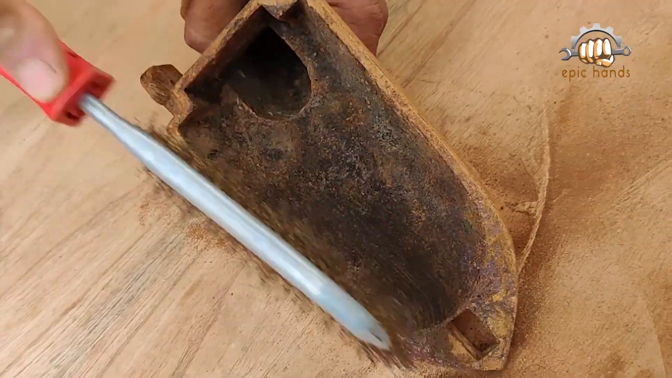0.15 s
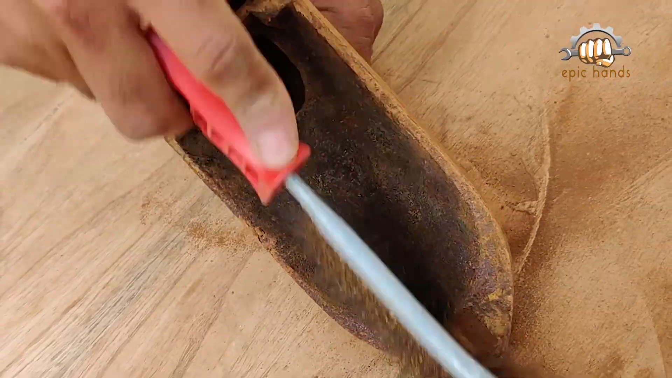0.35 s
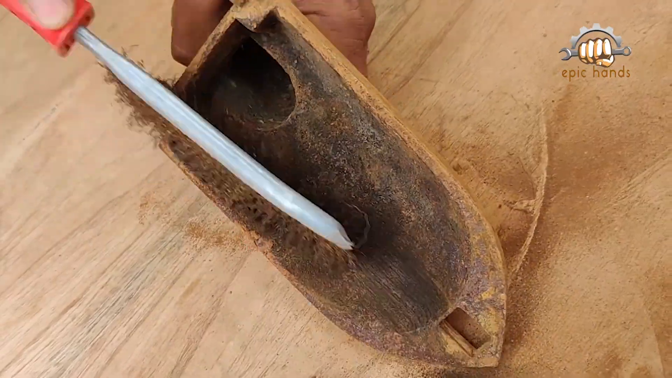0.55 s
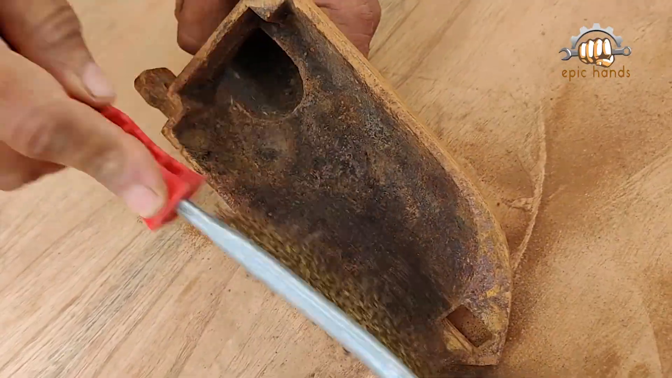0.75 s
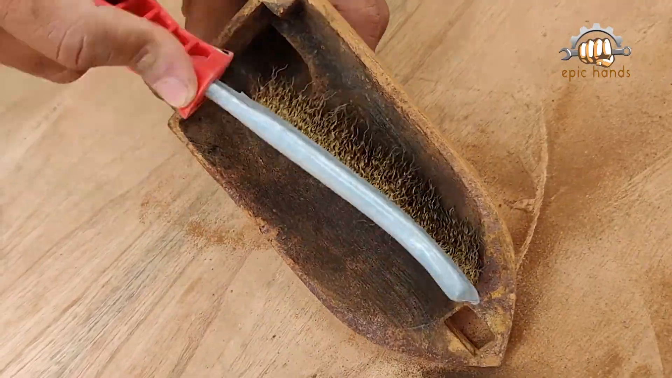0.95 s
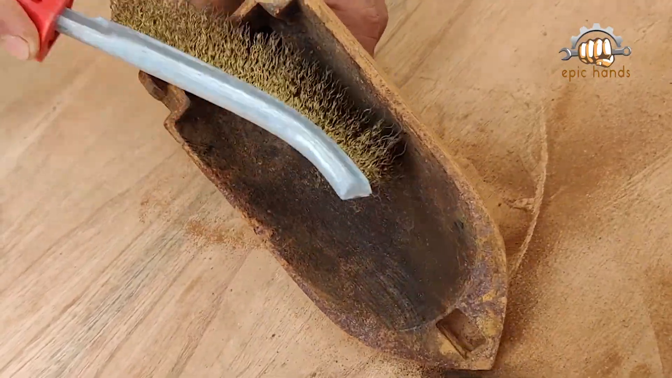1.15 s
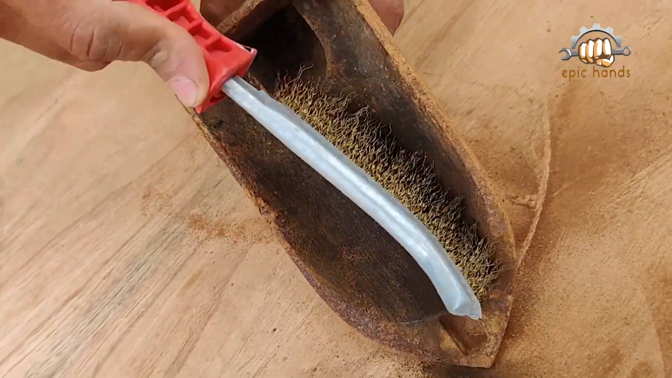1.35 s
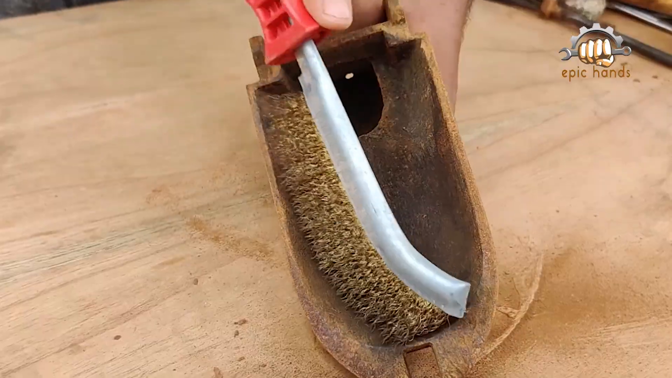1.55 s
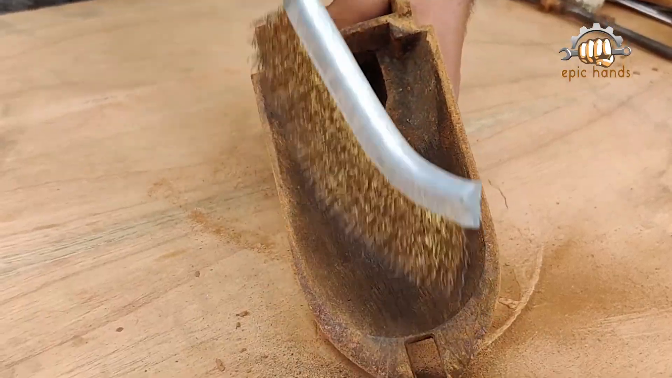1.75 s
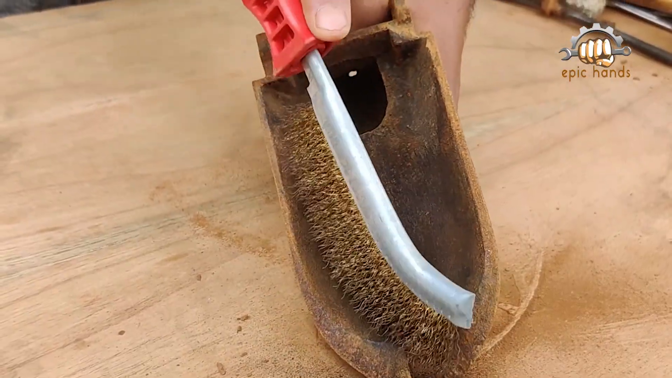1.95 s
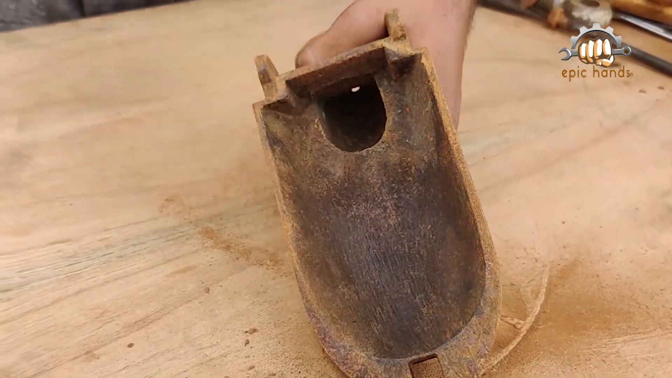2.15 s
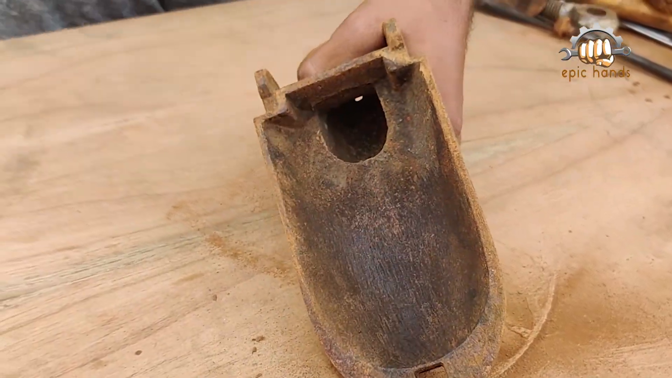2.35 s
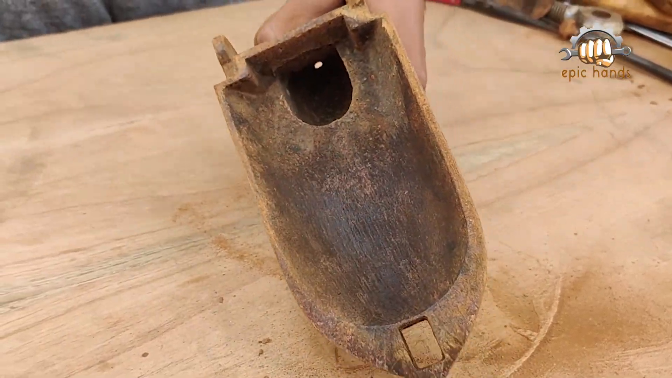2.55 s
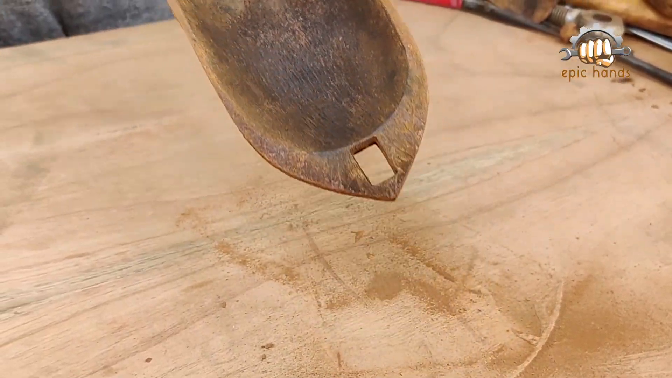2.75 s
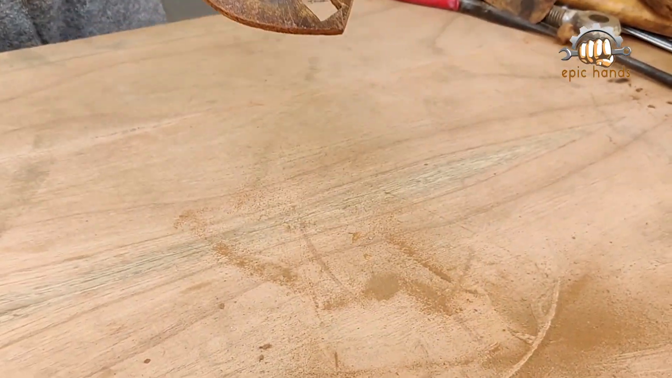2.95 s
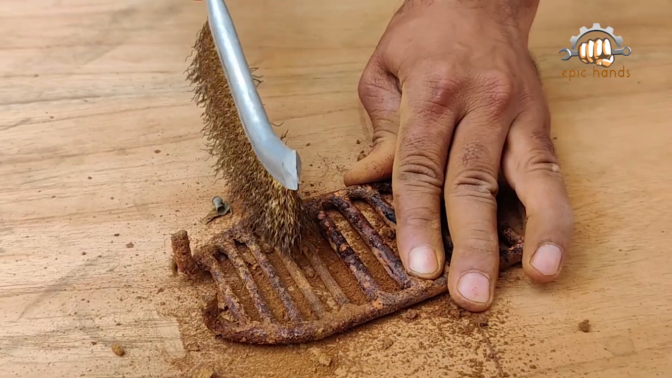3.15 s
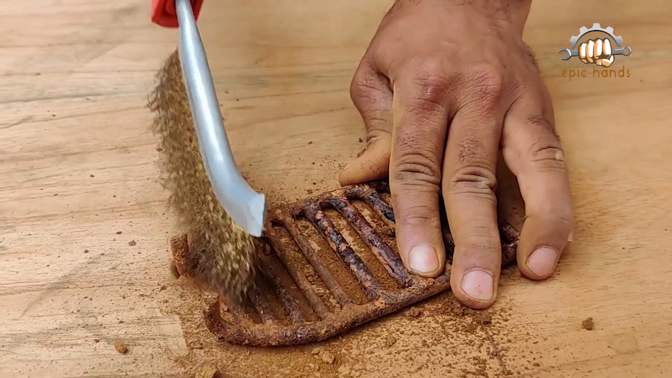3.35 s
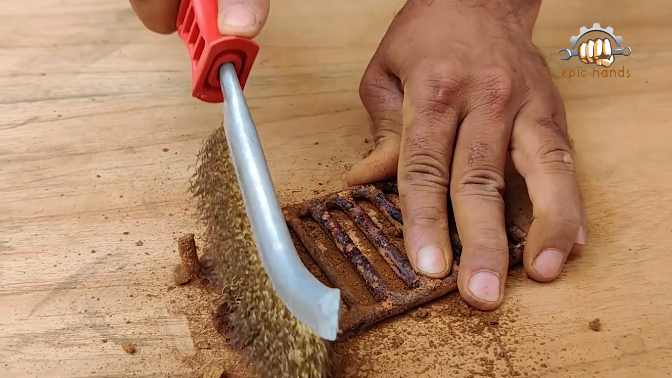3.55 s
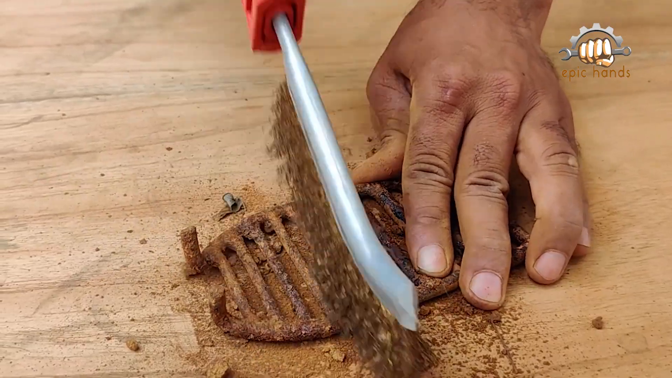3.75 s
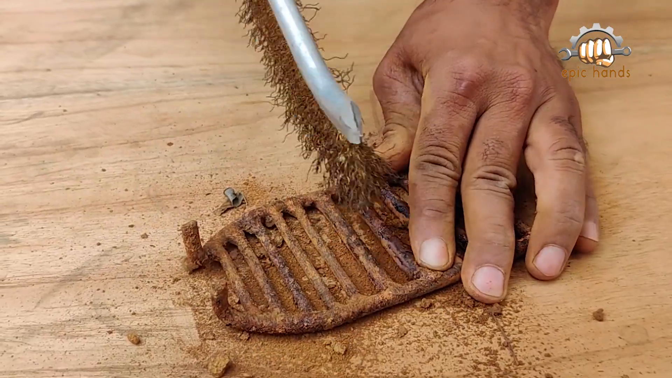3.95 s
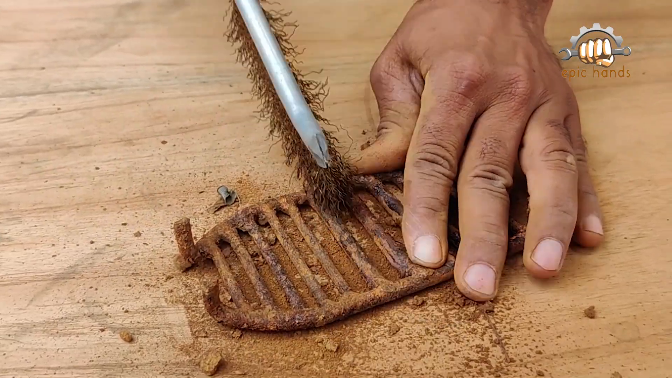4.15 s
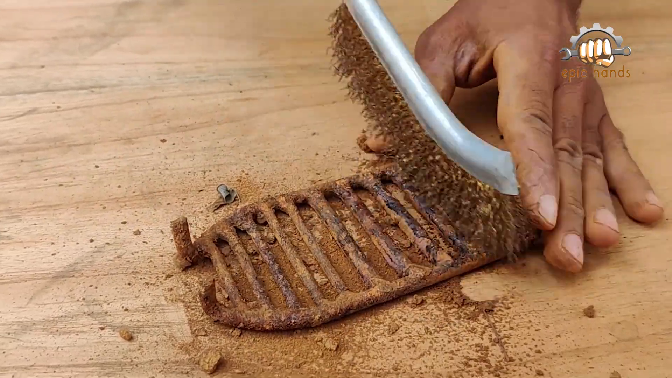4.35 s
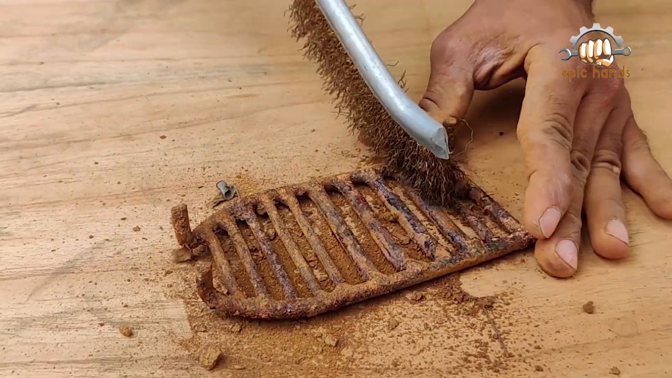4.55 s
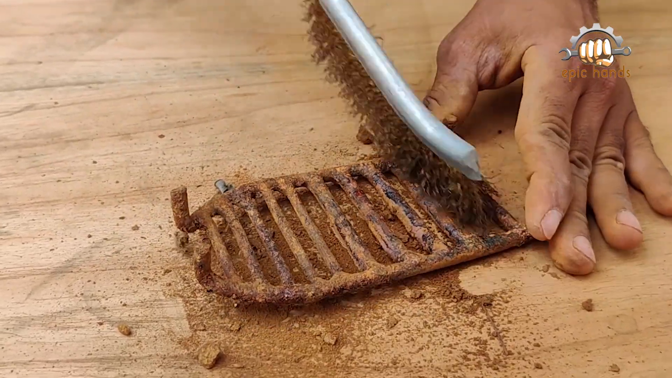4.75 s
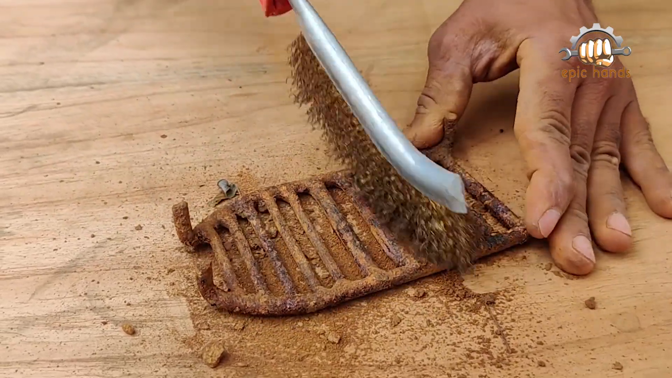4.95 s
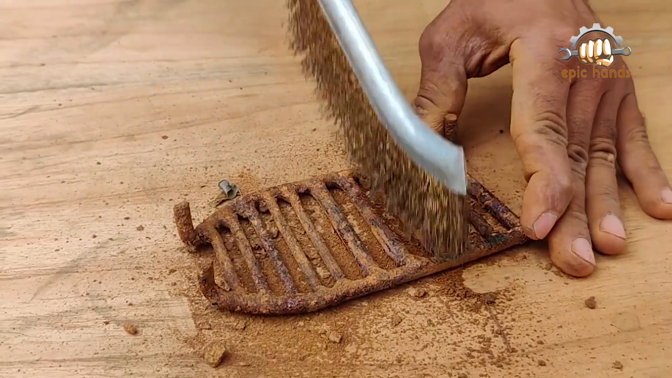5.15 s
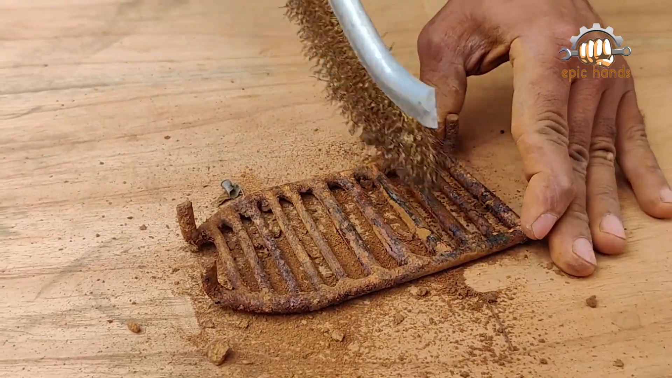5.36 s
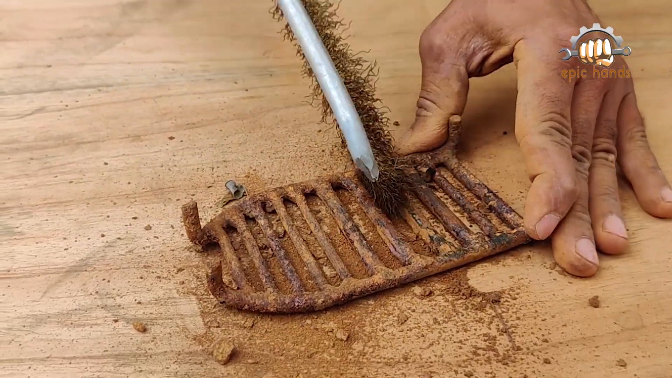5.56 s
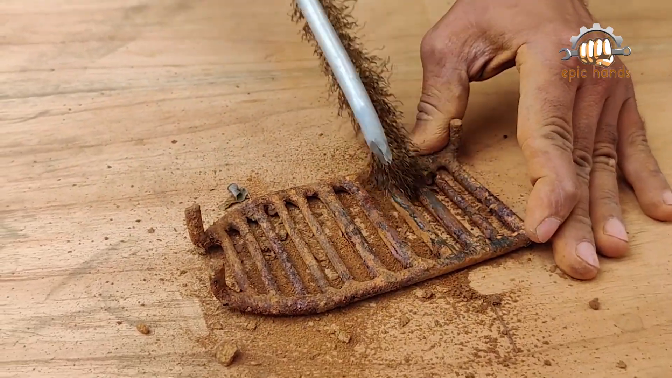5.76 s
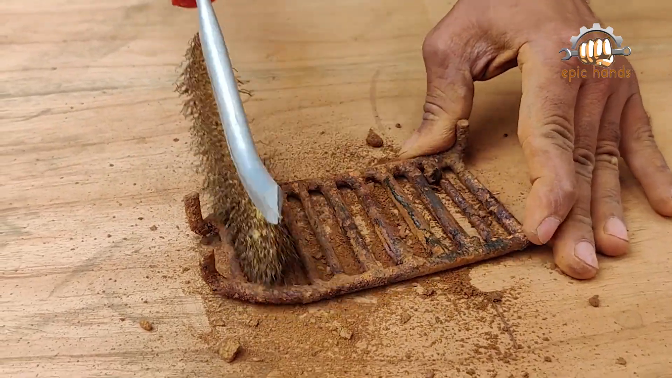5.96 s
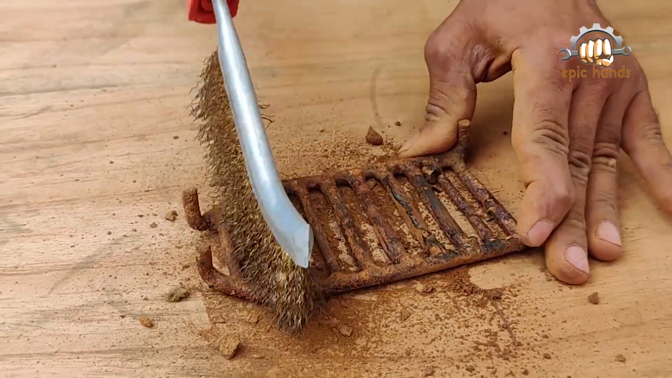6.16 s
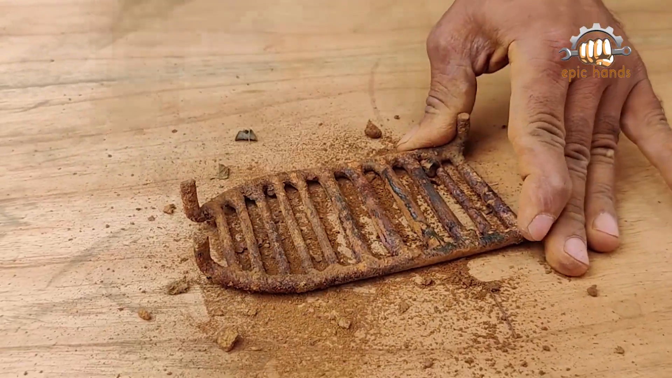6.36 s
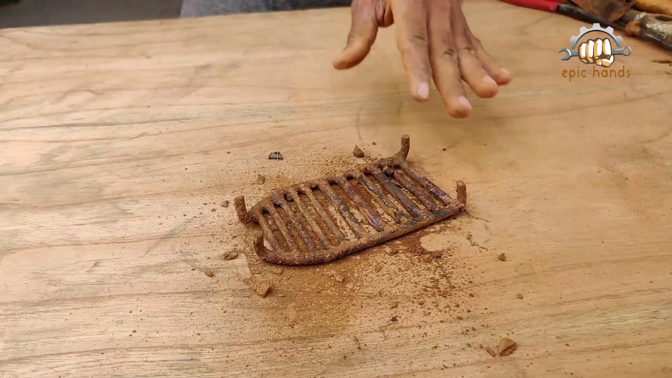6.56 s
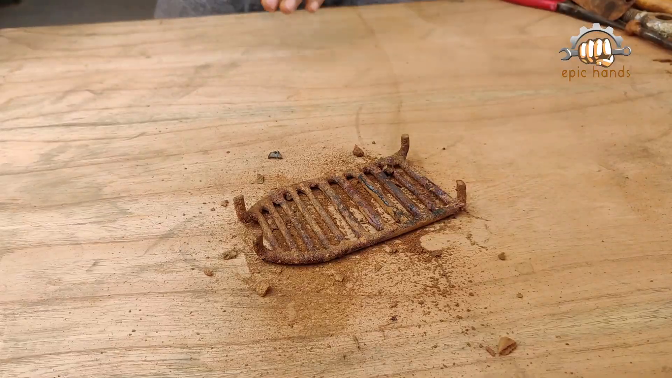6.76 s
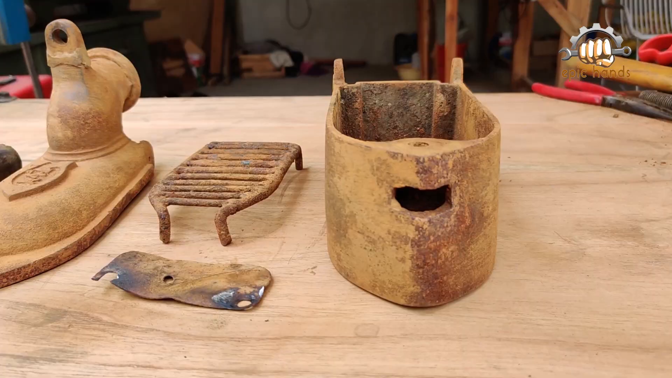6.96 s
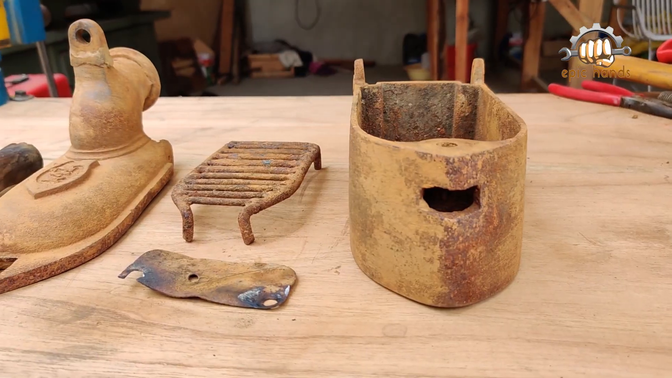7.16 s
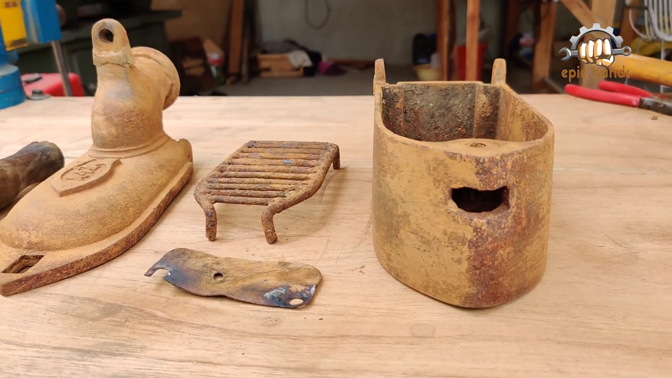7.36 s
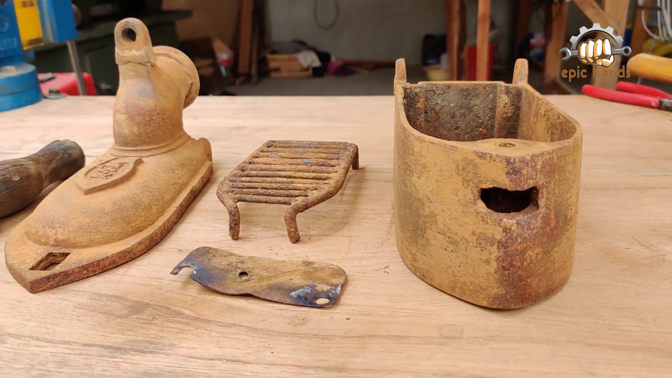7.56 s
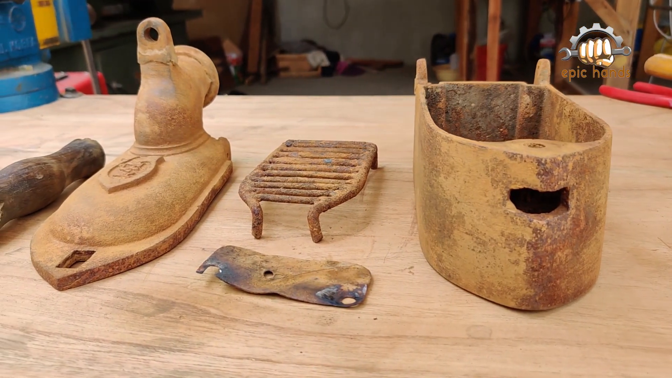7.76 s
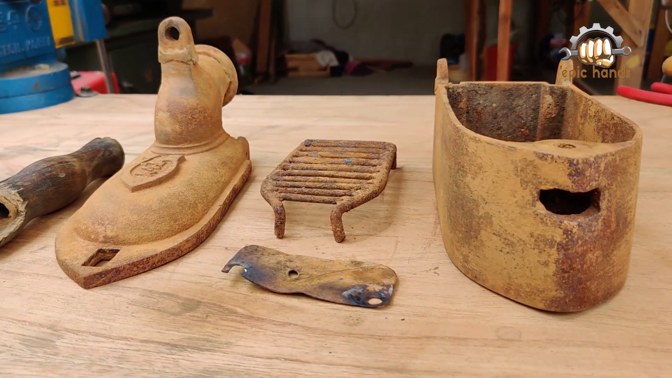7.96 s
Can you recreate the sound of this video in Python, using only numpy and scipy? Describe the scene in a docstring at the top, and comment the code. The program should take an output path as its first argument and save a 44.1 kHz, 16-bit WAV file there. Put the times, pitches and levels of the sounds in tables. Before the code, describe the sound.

A wire brush scrubs a rusty iron casting, the casting squeals as it drags away, then brush strokes slap a squeaking iron grate before birdsong.

```python
"""A wire brush scrubs a rusty iron casting on a wooden bench, then slaps and scrapes an iron grate: clumps
of bristle snaps excite coloured hiss, scrape and rumble, and blows ring the modes of the iron and bench.
In between the casting is dragged off with a squeal, and the grate squeaks too: pulse trains of stick and slip.
Under it the bench sways. Last come one far knock (decaying sines), a bird (gliding sines) and louder workshop
air (shaped noise). Heard by a spaced pair of microphones."""
import sys
import numpy as np
from scipy import signal
from scipy.fft import rfft, irfft, next_fast_len
from scipy.io import wavfile
from scipy.ndimage import uniform_filter1d

SR = 44100
rng = np.random.default_rng(int(sys.argv[2]) if len(sys.argv) > 2 else 0)


def unload_wav(signal):
    """Save mono or channel-first audio to the path in sys.argv[1] as 16-bit WAV at rate SR, clipped to [-1, 1]."""
    wavfile.write(
        sys.argv[1],
        SR,
        np.round(np.clip(np.atleast_2d(signal).T, -1, 1) * 32767).astype(np.int16),
    )


N = 357210


def gain_of(db):
    """Decibels to an amplitude factor."""
    return 10 ** (np.asarray(db) / 20)


def evened(x):
    """Scales to rms 1."""
    return x / np.sqrt(np.mean(x ** 2) + 1e-20)


def read(points, hz):
    """Reads a curve of (frequency, value) points on a log-frequency axis."""
    f, value = np.transpose(points)
    return np.interp(np.log(hz + 1), np.log(f + 1), value)


def add(mix, start_s, sound):
    """Mixes a sound in at a time."""
    part = mix[round(start_s * SR):][:len(sound)]
    part += sound[:len(part)]


def unroll(rows):
    """Start time of a table and its other columns, interpolated sample by sample."""
    s, *columns = np.transpose(rows)
    t = np.arange(s[0], s[-1], 1 / SR)
    return s[0], [np.interp(t, s, c) for c in columns]


def smoothed(x, across, along):
    """Averages a noise field over its first and second axis, then scales it to rms 1."""
    return evened(uniform_filter1d(uniform_filter1d(x, across, axis=0), along, axis=1))


def drift(n, smooth):
    """Random wander of rms 1 that changes over about smooth samples."""
    noise = rng.standard_normal(n)
    return evened(uniform_filter1d(uniform_filter1d(noise, int(smooth)), int(smooth)))


def heard(x, left_lag, pan_db):
    """Spaced pair: the left hears the source left_lag samples later and pan_db louder than the right."""
    size = next_fast_len(len(x) + 256)
    turn = np.exp(-1j * np.pi * np.fft.rfftfreq(size) * left_lag)
    z = rfft(x, size)
    left = irfft(z * turn, size) * gain_of(pan_db / 2)
    right = irfft(z / turn, size) * gain_of(-pan_db / 2)
    return np.array([left, right])[:, :len(x)]


# colour of the workshop air, still and then louder: pitch_hz, level_db (per Hz)
AIR_STILL = [(15, -27), (25, 6.5), (476, -15.5), (591, -10), (734, -23.5), (818, -19), (1070, -20),
             (2220, -22), (2910, -26), (6560, -31), (16000, -44.5)]
AIR_LOUD = [(15, -30), (25, 1), (64, -5), (217, -17.5), (363, -16), (439, -19), (714, -16.5), (988, -23.5),
            (2990, -24.5), (9320, -40), (16000, -31.5)]
# left-right likeness of air and room: pitch_hz, likeness (share)
LIKENESS = [(60, 0.835), (300, 0.853), (700, 0.566), (1500, 0.035), (5000, 0.027)]
STILL_DB, LOUD_DB, LOUD_FROM_S = -48.5, -40.5, 6.986


def linked(first, second, hz):
    """Blends two independent spectra so that the ears agree mostly in the bass."""
    same = np.clip(read(LIKENESS, hz), -1, 1)[:, None]
    return np.array([first, same * first + np.sqrt(1 - same ** 2) * second])


def air(colour, level_db, patchy_db):
    """Broadband air: random short-time spectra with drifting patches, alike in both ears mostly in the bass."""
    frames, hz = N // 256 + 5, np.fft.rfftfreq(1024, 1 / SR)
    a, b, c, d, patches = rng.standard_normal((frames, 513, 5)).T
    patches = smoothed(patches, 12, 14)
    z = linked(a + 1j * b, c + 1j * d, hz)
    z *= gain_of(read(colour, hz)[:, None] + patchy_db * patches) * (hz > 20)[:, None]
    return gain_of(level_db) * evened(signal.istft(z, nperseg=1024, noverlap=768)[1][:, :N])


def workshop_air():
    """Still air gives way to a louder air of another colour within about a millisecond."""
    louder = np.clip((np.arange(N) / SR - LOUD_FROM_S) / 0.00107, 0, 1)
    return (1 - louder) * air(AIR_STILL, STILL_DB, 3.48) + louder * air(AIR_LOUD, LOUD_DB, 1.84)


# decay of the room: pitch_hz, t60_s
ROOM_DECAY = [(100, 0.173), (500, 0.664), (2000, 0.307), (6000, 0.326), (14000, 0.173)]


def room(x):
    """Echoes as sparse taps of random sign, each band dying at its own speed, the bass mostly shared by both ears."""
    taps = np.zeros((2, SR // 2))
    at = np.arange(200, SR // 2 - 20, 20) + rng.integers(0, 20, (2, (SR // 2 - 201) // 20))
    np.put_along_axis(taps, at, rng.choice([-1., 1.], at.shape), 1)
    hz, t, z = signal.stft(taps, SR, nperseg=512)
    z = linked(z[0], z[1], hz)
    tail = signal.istft(z * gain_of(-60 * t / read(ROOM_DECAY, hz)[:, None]), SR, nperseg=512)[1]
    return signal.fftconvolve(x.mean(0)[None], tail / np.linalg.norm(tail[0]), axes=1)[:, :N]


# the hand shoves the bench: start_s, level_db (before the rise)
BENCH_SHOVES = [(0.0, -41.5), (0.22, -40.5), (0.3, -31), (0.54, -44.5), (0.86, -33.5), (1.2, -32),
                (1.45, -34.5), (1.6, -39.5), (1.83, -37.5), (2.5, -43), (3.04, -29.5), (3.4, -45.5),
                (3.6, -37), (3.84, -39), (4.1, -32.5), (4.49, -31), (4.75, -39.5), (5.0, -40.5),
                (5.23, -31), (5.46, -31.5), (5.709, -27), (6.0, -36), (6.22, -42), (7.0, -48.5)]
# swell of one shove: rise_s, fall_db_per_s
SWAY_RISE_S, SWAY_FALL = (0.0313, 67.2)
SWAY_REST_DB, SWAY_HZ, SWAY_WIDTH_HZ = -53, 46.55, 9.67


def sway():
    """The whole bench rocks on its legs: noise through one low resonance, nearly alike in both ears."""
    level, t = np.full(N, gain_of(SWAY_REST_DB)), np.arange(SR) / SR
    for start_s, level_db in BENCH_SHOVES:
        add(level, start_s, gain_of(level_db - SWAY_FALL * t) * np.minimum(t / SWAY_RISE_S, 1))
    b, a = signal.iirpeak(SWAY_HZ, SWAY_HZ / SWAY_WIDTH_HZ, SR)
    noise = rng.standard_normal((2, N))
    both, apart = evened(signal.lfilter(b, a, signal.lfilter(b, a, noise)))
    return level * np.array([both + 0.058 * apart, both - 0.14 * apart])


# knock, far off: start_s, level_db
FAR_KNOCK = [(7.282, -20)]
# modes of the knocked wood: pitch_hz, level_db, t60_s
WOOD_MODES = [(528, -4.5, 0.182), (624.4, 15, 0.0198), (799.6, -4, 0.111), (1130, -21.5, 0.049)]


def knock():
    """A hollow wooden thing is knocked once across the shop: a few modes die away together."""
    out, t = np.zeros(N), np.arange(SR // 2) / SR
    rise = np.minimum(t / 0.00277, 1)
    for start_s, level_db in FAR_KNOCK:
        modes = [gain_of(db - 60 * t / t60) * np.sin(2 * np.pi * hz * t) for hz, db, t60 in WOOD_MODES]
        add(out, start_s, gain_of(level_db - 3.5) * sum(modes) * rise)
    return out


# a chip, then a rising whistle: time_s, pitch_hz, level_db
BIRD_CALLS = [
    [(7.63, 3730, -67.5), (7.64, 3900, -47), (7.66, 4020, -46)],
    [(7.688, 3878, -47.5), (7.708, 4918, -32.5), (7.776, 5472, -33), (7.784, 5700, -33), (7.798, 5718, -29),
     (7.858, 5606, -72.5), (7.87, 5723, -44)],
]
# beats of the closing trill: top_s, level_db, lead_in_pitch_hz
TRILL_BEATS = [(7.911, -32, 6300), (8.024, -31, 6720), (8.125, -25.5, 6710)]
# lead-in of a beat: from_top_s, pitch (share of lead_in_pitch_hz), level_db (over the beat)
BEAT_LEAD_IN = [(-.056, 0.93, -21), (-.045, 0.97, -12.5), (-.01, .96, -15.5)]
# the two voices of a beat: from_top_s, pitch_hz, level_db (over the beat)
BEAT_LOWER = [(-.03, 5760, -9.5), (0, 5610, -1.5), (.075, 5743, -27)]
BEAT_UPPER = [(-.006, 5884, -10), (.004, 6152, -2), (.055, 6120, -19.5)]


def bird():
    """Whistled glides, two voices overlapping in the trill: each a sine that trembles in pitch and level."""
    out, beats = np.zeros(N), []
    for top_s, top_db, lead_hz in TRILL_BEATS:
        for voice, pitch_factor in ((BEAT_LEAD_IN, lead_hz), (BEAT_LOWER, 1), (BEAT_UPPER, 1)):
            beats.append([(top_s + s, hz * pitch_factor, db + top_db) for s, hz, db in voice])
    for rows in BIRD_CALLS + beats:
        start_s, (hz, level_db) = unroll(rows)
        turns = np.cumsum(hz * (1 + 0.0096 * drift(len(hz), 55))) / SR
        level = np.sqrt(2) * gain_of(level_db + 3.62 * drift(len(hz), 109))
        add(out, start_s, level * np.sin(2 * np.pi * turns) * signal.windows.tukey(len(hz), .2))
    return out


def slips(tables, overtones_db, waver, flutter_db):
    """Stick and slip: a harmonic pulse train whose rate wavers and whose overtones flutter."""
    out = np.zeros(N)
    for rows in tables:
        start_s, (hz, low_db, high_db) = unroll(rows)
        turns = np.cumsum(hz * (1 + waver * drift(len(hz), 35.6))) / SR
        tone = np.zeros(len(hz))
        for k, overtone_db in enumerate(overtones_db):
            level_db = (low_db if k < 2 else high_db) + overtone_db + flutter_db * drift(len(hz), 206)
            tone += gain_of(level_db) * np.sin(2 * np.pi * ((k + 1) * turns + rng.random()))
        add(out, start_s, np.sqrt(2) * tone * signal.windows.tukey(len(hz), .1))
    return out


# squeaks of the grate: time_s, slip_rate_hz, low_db (two lowest overtones), high_db (the others)
GRATE_SQUEAKS = [
    [(3.21, 848, -45, -51.5), (3.254, 891, -40, -39), (3.3, 860, -42, -46), (3.348, 864, -40, -52),
     (3.4, 890, -41, -49.5), (3.56, 875, -67, -84.5)],
    [(5.27, 844, -56.5, -51), (5.33, 890, -41, -45), (5.4, 885, -34.5, -44), (5.45, 875, -36, -48),
     (5.47, 914, -35.5, -58.5), (5.53, 908, -39.5, -54.5)],
    [(5.62, 790, -60, -68), (5.64, 779, -50, -59), (5.7, 785, -53, -64)],
]
# overtones of the squeak, the first at the slip rate: level_db (over low_db or high_db)
SQUEAK_OVERTONES = [-10, 1.5, 0, 5.5, -12.5, -1.5, -12, -9, -1.5, 2.5, -9.5, -15]


def squeak_grate():
    """The grate squeaks as it slips, at a rate that follows the table."""
    return heard(slips(GRATE_SQUEAKS, SQUEAK_OVERTONES, waver=.007, flutter_db=4.5), -2.11, 0.39)


# squeals of the casting: start_s, length_s, top_slip_rate_hz, low_db (two lowest overtones), high_db (the others)
CASTING_SQUEALS = [(2.478, 0.1455, 1171, -30, -48), (2.551, 0.1425, 1150, -29, -45),
                   (2.684, 0.172, 1010, -31, -49.5), (2.882, 0.133, 779, -38, -65.5)]
# overtones of the squeal, the first at the slip rate: level_db (over low_db or high_db)
SQUEAL_OVERTONES = [-9, 9, 6, 10.5, 8, -5.5, -5, -4]
GRIP_S, GRIP_DB, LET_GO_DB = 0.03357, -15, -35.5
SLACK_START, SLACK_END = .92, 0.79  # the rate is lower at both ends, as a share of the top


def burst(start_s, length_s, hz, low_db, high_db):
    """One squeal: the iron grips quickly and lets go slowly."""
    return [(start_s, hz * SLACK_START, low_db + GRIP_DB, high_db + GRIP_DB),
            (start_s + GRIP_S, hz, low_db, high_db),
            (start_s + length_s, hz * SLACK_END, low_db + LET_GO_DB, high_db + LET_GO_DB)]


def squeal_casting():
    """The dragged casting squeals in bursts of stick and slip."""
    bursts = [burst(*row) for row in CASTING_SQUEALS]
    return heard(slips(bursts, SQUEAL_OVERTONES, waver=0.0257, flutter_db=3.97), 13.0, 0.54)


CHANCE_DB = 2.5  # no two blows ring the modes alike


def blows(events, modes, push_ms, crack_ms, crack_db, rise_ms):
    """Each blow thuds the bench with a soft push, rings the iron and cracks with bristles and grit."""
    out, t = np.zeros(N), np.arange(SR // 4) / SR
    hz, width, _, struck_db = np.transpose(modes)[:, :, None]
    low, high = hz[:, 0] < 350, hz[:, 0] > 1700
    middle = ~low & ~high
    push = np.hanning(int(push_ms * SR / 1000) + 3)
    rise = 1 - np.exp(-1000 * t / rise_ms)  # the bristles cushion the first touch
    chance = rng.standard_normal((len(events), len(modes), 1))
    for (start_s, ring_db, thud_db, hard_db, _), draw in zip(events, chance):
        decay = np.exp(-np.pi * width * t)
        rings = -gain_of(struck_db + CHANCE_DB * draw) * decay * np.sin(2 * np.pi * hz * t)
        thud = np.convolve(np.gradient(rings[low].sum(0)), push)[:len(t)]  # slope of the low modes, softened
        grit = signal.lfilter([.4, -.4], [1, -.7], rng.standard_normal(len(t)))
        grit = grit * np.exp(-1000 * t / crack_ms) * rise
        crack = rings[high].sum(0) * rise + gain_of(crack_db) * grit
        ring = rings[middle].sum(0) * rise
        for peak_db, part in ((thud_db, thud), (ring_db, ring), (hard_db, crack)):
            add(out, start_s, gain_of(peak_db) * part / abs(part).max())
    return out


# the brush lands on the grate: start_s, ring_peak_db, thud_peak_db, crack_peak_db, rattle_db (iron on the bench)
GRATE_HITS = [(3.036, -36.5, -40, -31.5, -41), (3.304, -39, -28, -30, -42), (3.395, -26, -22, -22.5, -33.5),
              (3.598, -3.5, -18, -10, -17.5), (3.84, -3, -18, -18, -17.5), (4.103, -3.5, -11, -9.5, -18.5),
              (4.486, -28, -18, -40.5, -33), (4.745, -33, -8, -26, -26), (4.996, -1.5, -40, -9.5, -20),
              (5.228, -9.5, -13, -11, -23), (5.459, -9, -11, -12, -21), (5.518, -31, -22.5, -30, -41.5),
              (5.708, -8, -11, -7, -20.5), (5.956, -7, -30.5, -9, -21.5), (6.094, -22.5, -48.5, -31, -42.5),
              (6.184, -34.5, -32, -46.5, -54), (6.215, -3.5, -48, -7, -21), (6.274, -26, -33, -46.5, -36.5)]
# modes of the grate and bench: pitch_hz
GRATE_PITCHES = [95, 130, 200, 280, 420, 525, 680, 768, 1070, 1250, 1480, 1800, 2210, 2750, 3780, 6000,
                 7000]
# the same modes in order: width_hz, rubbed_db (above the colour), struck_db
GRATE_RINGS = [(30, 3.06, -16.5), (32.4, 4.18, 8), (45, 2.21, -1.5), (40.7, 1.93, 2.5), (301, 0.41, 13.5),
               (26.8, 6.45, -6.5), (61.3, 1.07, -0.5), (31.3, 2.71, -3.5), (71.7, 0.29, -4),
               (483, 0.256, 6.5), (96, 1.94, 1), (112.4, 3.44, 24), (89, 1.43, -30.5), (280, 1.6, 19),
               (8, 16, -22), (200, 4.2, 8.5), (86.4, 6.7, -20.5)]
GRATE_BODY = np.c_[GRATE_PITCHES, GRATE_RINGS]


def slap_grate():
    """The brush slaps the grate and excites its modes, the bench and the grit."""
    hits = blows(GRATE_HITS, GRATE_BODY, push_ms=3.504, crack_ms=11.0, crack_db=5.3, rise_ms=0.483)
    return heard(hits, -2.08, .3)


# the brush lands on the casting: start_s, ring_peak_db, thud_peak_db, crack_peak_db, rattle_db (iron on the bench)
CASTING_HITS = [(0.214, -27.5, -18, -19.5, -29.5), (0.35, -32.5, -33.5, -28, -40),
                (0.534, -32, -18, -14.5, -32), (0.698, -50.5, -21, -22, -34), (0.851, -25, -14, -16.5, -24),
                (1.106, -58, -18.5, -31.5, -38.5), (1.343, -47.5, -44, -47, -53),
                (1.453, -26, -19, -22.5, -31.5), (1.484, -37, -30.5, -35.5, -47.5),
                (1.64, -29, -17.5, -22, -33.5), (1.824, -41.5, -30, -20, -36),
                (2.43, -50.5, -34.5, -55, -48.5), (2.803, -39, -31.5, -34, -48),
                (2.942, -39, -35.5, -41, -51.5)]
# modes of the casting and bench: pitch_hz
CASTING_PITCHES = [155, 212, 300, 594, 750, 1900, 4020, 4470, 5940, 7120, 9120, 11230]
# the same modes in order: width_hz, rubbed_db (above the colour), struck_db
CASTING_RINGS = [(27.778, 4.5, 9), (37.3, 6.5, 9), (37.037, 1.5, -1.5), (6.96, -30.5, -41),
                 (64.4, 4.5, -19), (90, 6, -11), (50.6, 15, -8.5), (66, 16.5, -1), (45, 12, -10.5),
                 (60, 5.5, -14), (120, 1.5, -1), (22, 20, -37)]
CASTING_BODY = np.c_[CASTING_PITCHES, CASTING_RINGS]


def hit_casting():
    """The brush lands on the casting and excites its modes, the bench and the grit."""
    hits = blows(CASTING_HITS, CASTING_BODY, push_ms=2.54, crack_ms=12, crack_db=-10.5, rise_ms=0.293)
    return heard(hits, -6, -0.297)


SLOWED_DB = 20  # a stroke has slowed by this much after its slow_s


def pressing(strokes, swell, hits=(), rattle=()):
    """Force on hiss, scrape and rumble: each stroke speeds up and slows down, each blow leaves a rattle."""
    start_db, rise_bend, slow_bend, *shares = swell
    force, t = np.zeros((3, N)), np.arange(SR // 3) / SR
    for start_s, rise_s, slow_s, hiss_db, scrape_db, rumble_db in strokes:
        under_db = start_db * np.maximum(1 - t / rise_s, 0) ** rise_bend
        under_db += SLOWED_DB * (np.maximum(t - rise_s, 0) / slow_s) ** slow_bend
        levels_db = (hiss_db, hiss_db + scrape_db, hiss_db + rumble_db)
        for part, db, share in zip(force, levels_db, (1, *shares)):
            add(part, start_s, gain_of(db - share * under_db) * np.minimum(t / 0.00081, 1))
    for start_s, *_, rattle_db in hits:
        for part, (db, fall) in zip(force, rattle):
            add(part, start_s, gain_of(rattle_db + db - fall * t) * np.minimum(t / 0.00107, 1))
    return force


TAPS = 8192


def causal(db):
    """Impulse response of unit energy and least delay for a spectrum in dB."""
    log_gain = np.maximum(db - db.max(), -100) * np.log(10) / 20
    circle = np.concatenate([log_gain, log_gain[-2:0:-1]])
    taps = np.fft.ifft(np.exp(np.conj(signal.hilbert(circle)))).real[:TAPS // 2]
    return taps / np.linalg.norm(taps)


# start and end of each job (casting, casting with the duller brushing, drag, grate): time_s
JOB_TIMES = (0, 1.55, 1.4, 3.1, 2.35, 3.15, 3.0, 7.1)
CASTING_JOB, DULLER_JOB, DRAG_JOB, GRATE_JOB = np.reshape(JOB_TIMES, (-1, 2))


def rub(force, job, colour, modes, per_s, spread_db, clump_db, lags, pan_db):
    """Tips snap over the rust in clumps; hiss, scrape and rumble pass the modes, from several places."""
    hz = np.fft.rfftfreq(TAPS, 1 / SR)
    db = read(colour, hz) + sum(up / (1 + (2 * (hz - f) / w) ** 2) for f, w, up, _ in modes)
    # split at 3500 and 900 Hz into three bands
    below = [-10 * np.log10(1 + (hz / f) ** 8) for f in (3500, 900)]
    above = [10 * np.log10(1 - gain_of(2 * b) + 1e-9) for b in below]
    layers = [causal(db + d) for d in (above[0], below[0] + above[1], below[1])]
    busy = slice(round(job[0] * SR), round(job[1] * SR))
    force, out = force[:, busy], np.zeros((2, N))
    n = force.shape[1]
    clumps = gain_of(clump_db * drift(n, 295))
    for lag in lags:
        size = gain_of(spread_db * np.minimum(rng.exponential(1, n), 5)) * rng.standard_normal(n)
        snaps = evened(clumps * size * (rng.random(n) < per_s / SR))
        rubbed = sum(signal.oaconvolve(snaps * f, taps)[:n] for f, taps in zip(force, layers))
        out[:, busy] += heard(rubbed, lag, pan_db)
    return out / np.sqrt(len(lags))


# pulls of the casting: start_s, rise_s, slow_s, hiss_db, scrape_db (above hiss), rumble_db (above hiss)
DRAG_PULLS = [(2.38, 0.058, 0.056, -61.5, -3, 19), (2.475, 0.045, 0.1154, -36.5, 14, -10),
              (2.555, 0.0272, 0.141, -36.5, 11.5, -9), (2.69, 0.0312, 0.1006, -36, 12.5, -12),
              (2.85, 0.064, 0.133, -48.5, 5.5, 3)]
# shape of a pull: start_db (under the top), rise_bend, slow_bend, scrape_share, rumble_share (of the swell)
DRAG_SHAPE = (17.4, 1.25, 1.087, 0.98, 0.64)
# colour of the drag: pitch_hz, level_db (per Hz)
DRAG_COLOUR = [(53, -46), (90, -6), (680, -30.5), (1070, -21.5), (1440, -23.5), (2170, -4), (2470, -21.5),
               (5480, -20.5), (8250, -23), (8800, -20), (15400, -62)]
# modes heard in the drag: pitch_hz
DRAG_PITCHES = [2142, 3240, 5314]
# the same modes in order: width_hz, rubbed_db (above the colour), struck_db (unplayed)
DRAG_RINGS = [(150, 6.16, 0), (100.3, 4.5, 0), (249, 6.9, 0)]


def drag_casting():
    """The casting is dragged away: rough iron scrapes over the bench in a few pulls."""
    return rub(pressing(DRAG_PULLS, DRAG_SHAPE), DRAG_JOB, DRAG_COLOUR, np.c_[DRAG_PITCHES, DRAG_RINGS],
               per_s=5000, spread_db=1.26, clump_db=1.81, lags=[8, 12, 16], pan_db=0.91)


# bass under the grate: time_s, level_db
BASS_UNDER_GRATE = [(3.0, -2), (3.5, -4.5), (4.4, -3.5), (4.5, 2.5), (5.9, 2), (6.1, -6.5), (7.0, -5)]


def bass_shifted(x):
    """The bench booms more or less under the grate as time goes on."""
    bass = signal.sosfiltfilt(signal.butter(2, 250, fs=SR, output="sos"), x)  # Hz
    level_db = np.interp(np.arange(N) / SR, *np.transpose(BASS_UNDER_GRATE))
    return x + bass * (gain_of(level_db) - 1)


# strokes on the grate: start_s, rise_s, slow_s, hiss_db, scrape_db (above hiss), rumble_db (above hiss)
GRATE_PULLS = [ (3.035, .004, .07, -29, -1.5, -5.5), (3.12, 0.0435, 0.1327, -33, -4, 0),
               (3.3, 0.0176, 0.145, -37, 0.5, -2.5), (3.389, 0.0337, 0.0663, -30.5, -4.5, -1.5),
               (3.63, 0.0602, 0.0648, -30.5, -4, -5.5), (3.86, 0.0786, 0.0808, -32.5, -2.5, -6.5),
               (4.12, 0.0705, 0.0776, -33, -4, -0.5), (4.395, .02, .08, -64, 6, 8),
               (4.519, 0.0626, 0.0848, -33, -3.5, -4), (4.758, 0.0742, 0.0847, -34, -1.5, -2.5),
               (5.01, 0.0719, 0.0549, -33, -2, -6.5), (5.241, 0.0645, 0.1035, -32, -2.5, -4.5),
               (5.37, 0.05, 0.163, -42.5, -25.5, -28.5), (5.48, 0.063, 0.096, -34, -4, -14),
               (5.72, 0.0841, 0.0723, -32, -4, -5.5), (5.99, 0.0813, 0.051, -32.5, -2.5, -4.5),
               (6.24, 0.0467, 0.0577, -39, -5, 4), (6.399, 0.0126, 0.047, -62, 13, 16),
               (6.49, 0.0289, 0.0497, -57, 1.5, 11.5), (6.735, .008, .07, -48, -0.5, -6.5),
               (6.88, 0.048, 0.0466, -68, 17, 7.5)]
# shape of a stroke: start_db (under the top), rise_bend, slow_bend, scrape_share, rumble_share (of the swell)
GRATE_SHAPE = (16.96, 1.5, 1.648, 0.843, 0.79)
# rattle of the grate, rows for hiss, scrape, rumble: level_db (over rattle_db), fall_db_per_s
GRATE_SHAKE = [(-15.5, 484), (-3.5, 386), (-0.5, 259)]
# colour of the rubbed grate: pitch_hz, level_db (per Hz)
GRATE_COLOUR = [(53, -24.5), (90, 2.5), (124, -4.5), (242, 0.5), (598, -13), (741, -5), (881, -10.5),
                (1790, -13.5), (2470, -19.5), (8610, -11), (15400, -30.5)]


def brush_grate():
    """The brush is pulled across the grate, its bristles snapping over the iron."""
    pulling = pressing(GRATE_PULLS, GRATE_SHAPE, GRATE_HITS, GRATE_SHAKE)
    return bass_shifted(rub(pulling, GRATE_JOB, GRATE_COLOUR, GRATE_BODY, per_s=9000, spread_db=2.73,
                            clump_db=1.727, lags=[-18.5, -12.5, -3.5, 0.5, 9.5], pan_db=1.0))


# strokes on the casting: start_s, rise_s, slow_s, hiss_db, scrape_db (above hiss), rumble_db (above hiss)
CASTING_SCRUBS = [ (0.0, .045, .065, -23.5, -13.5, -11), (0.214, 0.0615, 0.1235, -27.5, -15, -4.5),
                  (0.34, 0.014, 0.0369, -23.5, -16.5, -19.5), (0.532, 0.0508, 0.15, -27, -14, -6),
                  (0.655, 0.0255, 0.0733, -27.5, -12, -16), (0.87, .035, .065, -28, -14.5, -1.5),
                  (1.0, .035, .04, -38, -8.5, -2), (1.06, .016, .04, -42, -8, -2),
                  (1.106, .036, .055, -30, -14.5, -2.5), (1.2, .072, .06, -28, -13.5, -4),
                  (1.335, .025, .09, -38, -10, 0), (1.451, 0.069, 0.0663, -30.5, -8.5, -4.5),
                  (1.57, 0.0448, 0.0721, -31.5, -6, -2.5), (1.822, .04, .06, -32.5, -9.5, -3),
                  (1.925, 0.0297, .035, -37, -6.5, -1.5)]
# shape of a stroke: start_db (under the top), rise_bend, slow_bend, scrape_share, rumble_share (of the swell)
CASTING_SHAPE = (14.56, 1.21, 1.532, 0.586, 0.641)
# rattle of the casting, rows for hiss, scrape, rumble: level_db (over rattle_db), fall_db_per_s
CASTING_SHAKE = [(-15.5, 397), (-28, 297.5), (-2.5, 214.5)]


def casting_force():
    """Force of the brush on the casting, rattles included."""
    return pressing(CASTING_SCRUBS, CASTING_SHAPE, CASTING_HITS, CASTING_SHAKE)


DULLER_FROM_S = 1.425  # from here the brushing is duller
HUM_HZ, HUM_WIDTH_HZ, HUM_DB = 594, 5, 4


def is_duller():
    """True for each sample of the duller brushing."""
    return np.arange(N) / SR > DULLER_FROM_S


def hum_casting():
    """In the duller brushing the casting hums on after a stroke: one long-ringing mode, fed by the rumble force."""
    force = casting_force()[2] * is_duller()
    b, a = signal.iirpeak(HUM_HZ, HUM_HZ / HUM_WIDTH_HZ, SR)
    mode = signal.lfilter(b, a, force * rng.standard_normal(N))
    # a narrow mode passes little of the noise, so the width makes up its level
    return heard(gain_of(HUM_DB) * np.sqrt(SR / HUM_WIDTH_HZ) / 20 * mode, 3.56, .3)


# colour of the rubbed casting, first and then in the duller brushing: pitch_hz, level_db (per Hz)
CASTING_COLOUR = [(41, -15.5), (70, -4.5), (216, -4.5), (584, -19.5), (732, -13.5), (1050, -26.5),
                  (1890, -18.5), (2310, -26), (3980, -22), (7480, -10), (8960, -7.5), (15400, -26)]
DULLER_COLOUR = [(41, -22), (70, -1.5), (221, -0.5), (584, -15), (749, -15.5), (1380, -28.5), (2530, -17),
                 (3630, -30), (9160, -17.5), (15400, -44.5)]


def brush_casting():
    """The brush scrubs the casting, at first brightly and then with a duller colour."""
    force, duller = casting_force(), is_duller()
    first = rub(force * ~duller, CASTING_JOB, CASTING_COLOUR, CASTING_BODY, per_s=9000, spread_db=2.87,
                clump_db=2.36, lags=[-16.0, -10.5, -7, -1.5, 4], pan_db=0.7)
    then = rub(force * duller, DULLER_JOB, DULLER_COLOUR, CASTING_BODY[:-1], per_s=9000, spread_db=2.27,
               clump_db=3.2, lags=[-10.0, -6, 1.5, 12.0], pan_db=-0.88)
    return first + then


def shifting(x, patch_db, streak_db):
    """Random patches and narrow short streaks make the colour of the brushing swell and fade."""
    z = signal.stft(x, nperseg=512)[2]
    wide, narrow = rng.standard_normal((z.shape[2], z.shape[1], 2)).T
    patches = smoothed(wide, 9, 12)
    streaks = np.maximum(smoothed(narrow, 2, 11) - 1, 0)  # only the strongest peaks are kept
    return signal.istft(z * gain_of(patch_db * patches + streak_db * streaks), nperseg=512)[1][:, :N]


def scene():
    """Work at the bench, far sounds, their echoes and the air of the shop."""
    near = shifting(brush_casting() + brush_grate(), patch_db=2.4, streak_db=7)
    near += hum_casting() + drag_casting()
    near += hit_casting() + slap_grate()
    near += squeal_casting() + squeak_grate()
    song, tap = heard(bird(), -15, 0.61), heard(knock(), -5, 1.3)
    echoes = room(gain_of(-17.5) * near + gain_of(-4) * song + gain_of(-23) * tap)
    return near + song + tap + echoes + sway() + workshop_air()


# the two capsules differ in colour: pitch_hz, left_over_right_db
CAPSULES = [(500, .6), (2500, -.2), (9000, -3.5), (14000, 3.5)]
EDGE_HZ = 15900


def record(dry):
    """The colour of each capsule, then a low-pass as the band limit."""
    half_db = read(CAPSULES, np.fft.rfftfreq(N, 1 / SR)) / 2
    coloured = irfft(rfft(dry) * gain_of([half_db, -half_db]), N)
    low_pass = signal.firwin(511, EDGE_HZ, window=("kaiser", 9), fs=SR)
    return signal.oaconvolve(coloured, low_pass[None], "same")


dry = scene()
out = record(dry)
unload_wav(out)
```